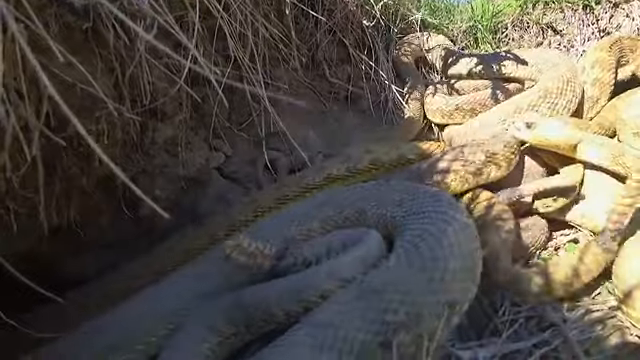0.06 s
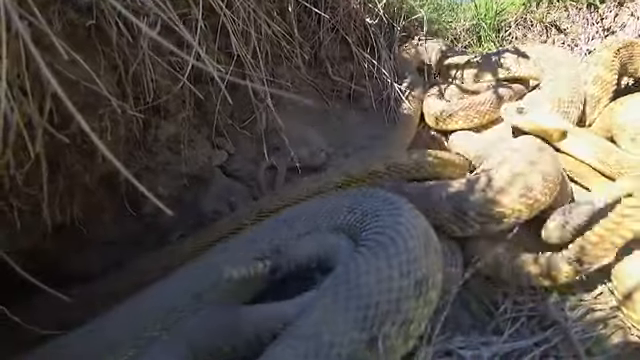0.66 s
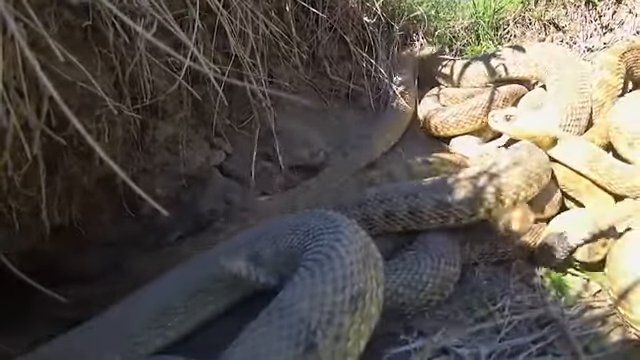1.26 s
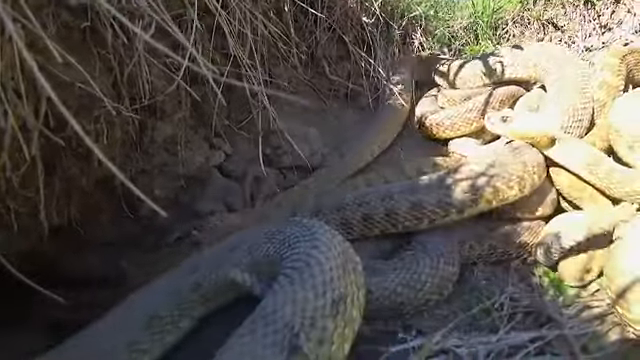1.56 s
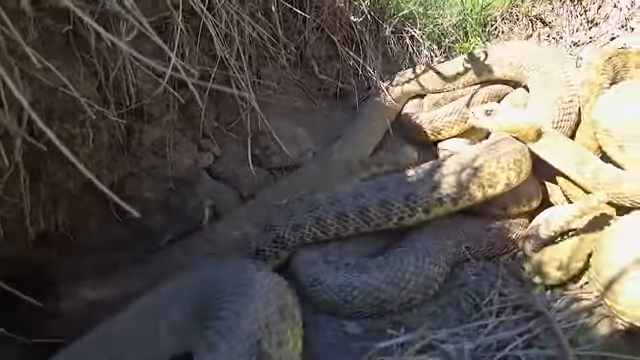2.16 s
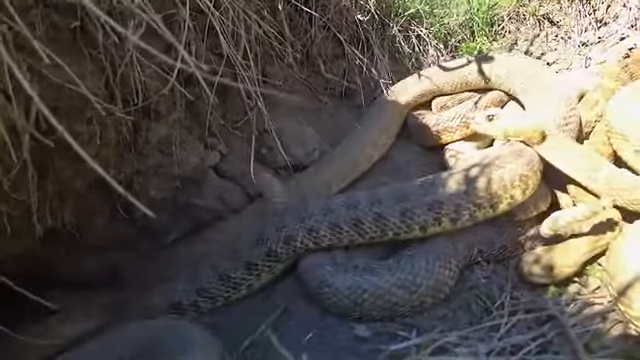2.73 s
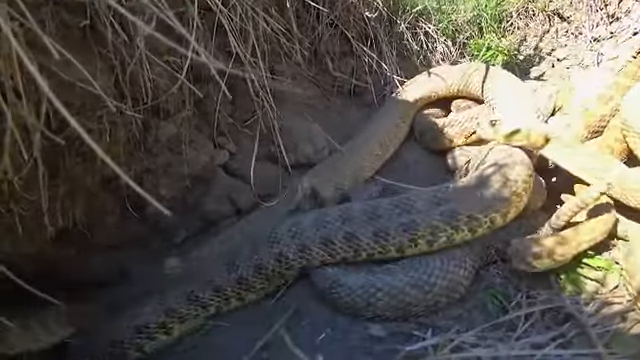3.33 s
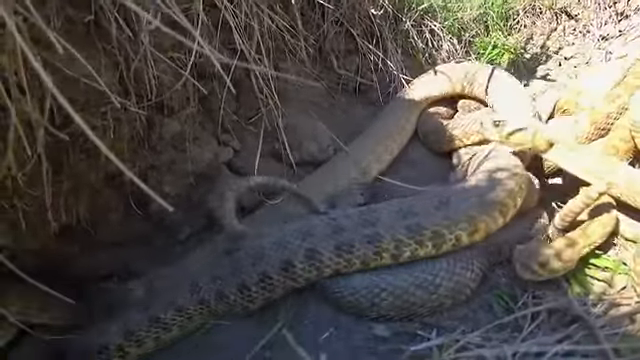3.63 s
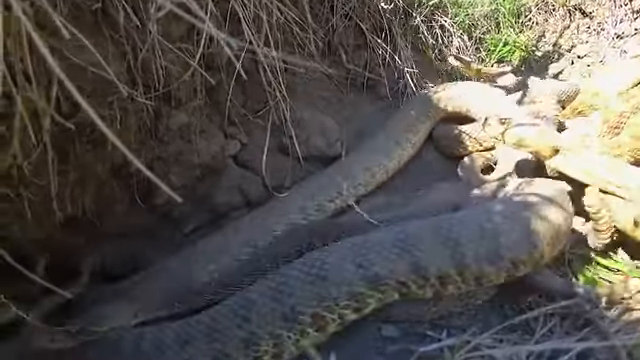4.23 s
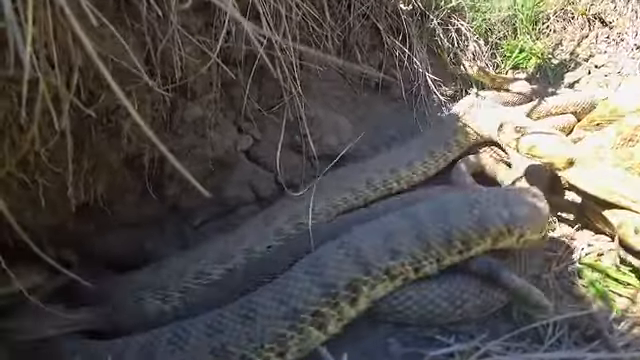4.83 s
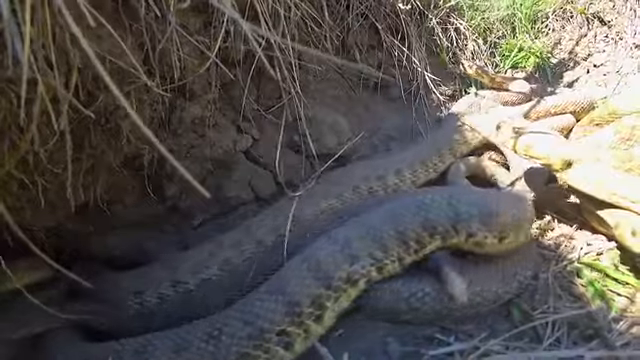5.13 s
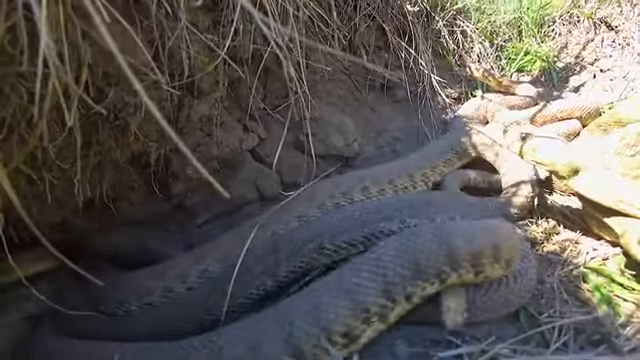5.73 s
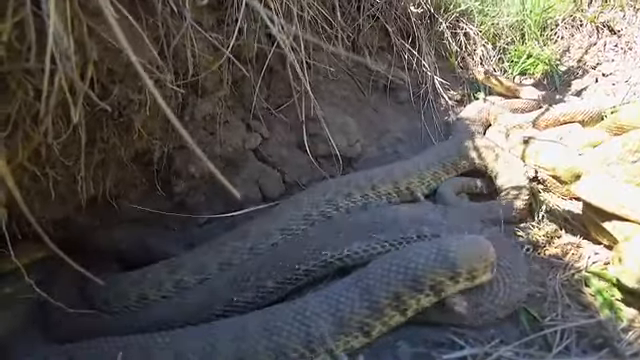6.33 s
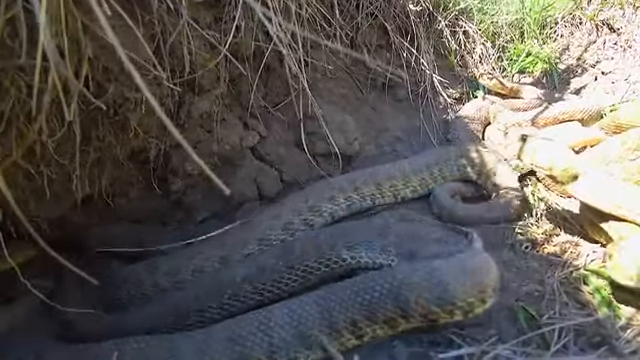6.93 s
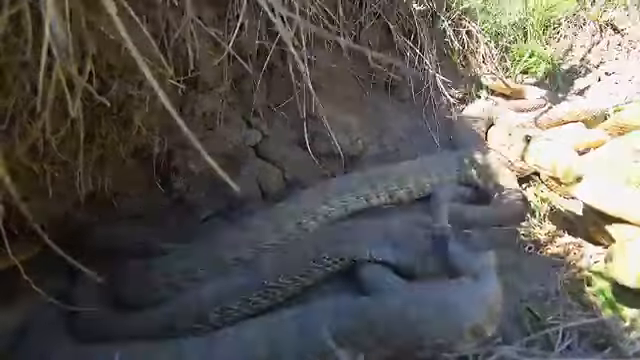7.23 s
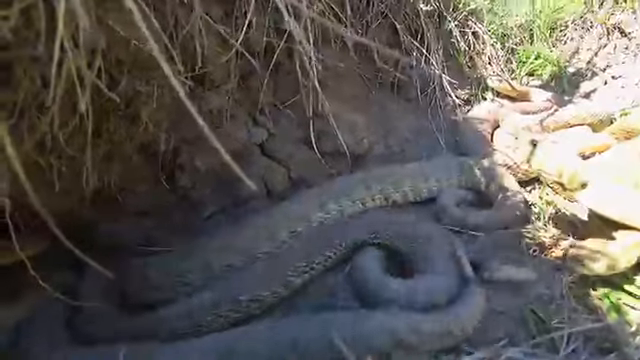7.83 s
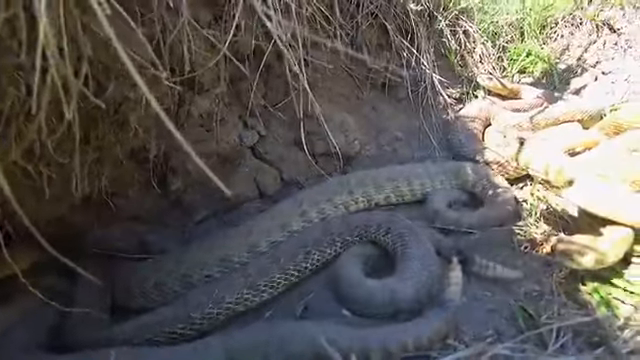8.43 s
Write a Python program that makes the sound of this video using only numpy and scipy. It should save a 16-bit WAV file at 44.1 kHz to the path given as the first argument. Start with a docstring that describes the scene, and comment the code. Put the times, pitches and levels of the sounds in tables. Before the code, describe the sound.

From the start, a rattlesnake buzzes its tail close to the microphone in a shallow earth den: a loud, dry, high whirr whose tone shifts as the tail turns. Around 2 seconds it stutters and falls apart into a quick run of sharp, hollow clicking shakes, lasting until about 3 seconds. The rest is quieter. Snakes slide over soil and each other with a soft hiss and gritty scrape, their rattles dragging and ticking irregularly, with small clusters of clicks between 3.7 and 5 seconds and stronger ones near 5.9 and 7.3 seconds. A farther rattle whirrs briefly at 4.5 seconds, then more steadily from about 5.7 to 7.3. Another starts in soft spurts from 7.4 seconds to the end at about 8.5. A low outdoor rumble runs underneath, with soft handling bumps near 2 and 4 seconds and a few faint knocks after 5.

```python
"""A rattlesnake's tail buzzes close by in a shallow earth den, about 78 strokes a second, then falls
apart into single shakes: loose hollow segments clash and ring, their colour turning with the tail.
Snakes slide over soil and each other, rattles dragging and clicking; a farther one whirrs, and a last
one starts up softly. Bodies scrape the dirt over a low outdoor rumble, with soft handling bumps and
a few small knocks."""
import sys
import numpy as np
from scipy import signal
from scipy.fft import rfft, irfft, next_fast_len
from scipy.io import wavfile
from scipy.ndimage import uniform_filter1d, map_coordinates

SR = 44100
rng = np.random.default_rng(int(sys.argv[2]) if len(sys.argv) > 2 else 0)


def transcribe(u):
    """Save the signal u as a 16-bit wav file named by the first command-line argument.

    u: samples, shape (n,) or (channels, n), limited to [-1, 1]; the rate is SR.
    q: integer samples, one column per channel.
    """
    v = np.clip(np.atleast_2d(u).T, -1, 1)
    q = np.round(v * 32767).astype(np.int16)
    wavfile.write(sys.argv[1], SR, q)


N = 378378
BUZZ_END_S = 2.195

# the near rattle's pose: time_s, pitch_ratio of its low resonances, turned_away (0-1), treble_db
RATTLE_POSE = [(0, 1.016, 0.14, -0.5), (.37, 0.86, 0, 2.5), (.7, 0.96, 0.2, 1), (.9, 1.075, 0.37, 0.5),
               (1.1, 1.033, 0.9, 2), (1.55, 1.033, 0.9, 1), (1.85, 1.0, 0.85, -3.5),
               (2.25, 1.06, 0.53, -6.5), (2.46, 1.27, 0, 2), (2.64, 1.17, 0.5, 2.5), (2.78, 1.06, 0.7, 3),
               (2.88, 0.89, 1, 9), (2.98, 0.8, 0.1, -4), (3.1, 0.84, 0, -5), (3.9, 1.15, 0.2, -5),
               (5.05, 1.17, 0, -10.5), (6.0, 1.3, 0, -7), (7.3, 1.22, 0.2, -9)]
# how hard the bodies slide: time_s, level_db
BODY_SLIDE = [(0, -60.5), (1.6, -59.5), (2.1, -48), (3.6, -51.5), (4.04, -47.5), (4.35, -49), (4.75, -55.5),
              (5.3, -55), (5.52, -52), (6.1, -55.5), (7.0, -58), (8.58, -60)]
# stereo width of the rattles and scales: frequency_hz, side_over_mid_db
RATTLE_WIDTH = [(1000, -26), (2500, -72), (4500, -29), (8000, -15.5), (12000, -7)]
# stereo width of the ground and air: frequency_hz, side_over_mid_db
GROUND_WIDTH = [(60, -22), (150, -20), (300, -10), (700, -2.5), (2000, -1)]


def amp(db):
    return 10 ** (np.asarray(db) / 20)


def unit(x):
    return x / np.sqrt(np.mean(x ** 2) + 1e-20)


def steady(x, size):
    """Ride x to an rms of 1 over a running window of size samples."""
    return x / np.sqrt(np.abs(uniform_filter1d(np.mean(x ** 2, axis=0), size=size)))


def along(points, hz):
    """Read (frequency_hz, value) points on a log frequency axis."""
    frequencies, values = np.transpose(points)
    return np.interp(np.log(hz + 1), np.log(frequencies + 1), values)


def curves(rows):
    """An automation curve for each column after the time."""
    time_s, *columns = np.transpose(rows)
    return [np.interp(np.arange(N) / SR, time_s, column) for column in columns]


def wobble(rate):
    """A smooth random curve, rate knots a second."""
    coarse = np.arange(0, N + 32, 32)
    knots = rng.standard_normal(int(N * rate / SR) + 4)
    smooth = map_coordinates(knots, [coarse * rate / SR], mode="nearest")
    return np.interp(np.arange(N), coarse, smooth)


def ring(x, colour, size=1024):
    """Ring x through a minimum-phase body of the given (frequency_hz, gain_db) colour."""
    cepstrum = irfft(np.log(amp(along(colour, np.fft.rfftfreq(size, 1 / SR)))))
    fold = np.r_[1, np.full(size // 2 - 1, 2), 1, np.zeros(size // 2 - 1)]
    response = irfft(np.exp(rfft(cepstrum * fold)))
    return signal.fftconvolve(x, response[None], axes=1)[:, :x.shape[1]]


def spread(pair, width):
    """Two unrelated signals, as mid and side, become left and right."""
    side = ring(pair[1:], width)[0]
    return np.array([pair[0] + side, pair[0] - side])


def panned(x, pan_db):
    """Left louder than right by pan_db."""
    return x * amp(np.array([pan_db, -pan_db]).reshape(2, -1) / 2)


def add(track, sound, start_s):
    part = track[:, round(start_s * SR):][:, :sound.shape[1]]
    part += sound[:, :part.shape[1]]


def contacts(size, per_second, hiss, life_s=0.00048):
    """Tiny random impacts on a bed of rubbing hiss, as a pair of noises for mid and side."""
    hits = (rng.random(size) < per_second / SR) * rng.exponential(size=size) * SR / per_second
    decay = np.exp(-1 / (life_s * SR))
    power = signal.lfilter([1 - decay], [1, -decay], hits)
    return rng.standard_normal((2, size)) * np.sqrt(power + hiss ** 2)


def strokes(rate_hz, depth_db, scatter):
    """Loudness of a shaken tail: segments clash once a stroke; scatter is timing jitter in strokes."""
    phase = np.cumsum(rate_hz * np.ones(N)) / SR + scatter * wobble(60)
    clash = ((1 + np.cos(2 * np.pi * phase)) / 2) ** 2
    gain = amp(depth_db * clash * (1 + 0.05 * wobble(75)))
    return gain / np.sqrt(uniform_filter1d(gain ** 2, size=3000))


def hollow_segments(clashes):
    """Contacts ring the near rattle's horny shells, whose colour follows the pose of the tail."""
    # the rattle's colour facing out and turned away: frequency_hz, gain_db
    facing = [(300, -32), (900, -28), (2200, -23.5), (3000, -18), (3800, -10), (4700, 1), (5600, 3.2),
              (7700, -2), (9000, -4.5), (12200, -8), (14000, -11), (15600, -20)]
    turned = [(300, -37.5), (900, -27.5), (2300, -22.5), (2750, -18.5), (3300, -6.5), (4000, -7.5),
              (4650, -1), (5250, -6), (5800, -3), (7100, -3.5), (8100, -3.7), (9000, -6.5), (11500, -7.5),
              (14000, -14.5), (15600, -23)]
    # its sharpest resonances: centre_hz, half_width_hz, boost_db
    resonances = [(4450, 240, 2.5), (5300, 220, 0)]
    hz, t, spectrum = signal.stft(clashes, SR, nperseg=512)
    time_s, *pose = np.transpose(RATTLE_POSE)
    pitch_ratio, away, treble_db = [np.interp(t, time_s, column) for column in pose]
    hz = hz[:, None]
    shifted = hz / pitch_ratio ** np.clip(2 - hz / 6000, 0, 1)  # only the low resonances move
    colour_db = (1 - away) * along(facing, shifted) + away * along(turned, shifted)
    colour_db += sum(db / (1 + ((shifted - centre) / width) ** 2) for centre, width, db in resonances)
    colour_db += treble_db * np.clip((hz - 5000) / 6000, 0, 1)
    gain = amp(colour_db)
    gain /= np.sqrt(np.mean(gain ** 2, axis=0))  # turning changes the colour, not the power
    return signal.istft(spectrum * gain, SR, nperseg=512)[1][:, :N]


def shifting_colour(x, depth_db, hold_s):
    """Loose segments and the paths round the den keep changing, so narrow ridges of colour come and go."""
    spectrum = signal.stft(x, nperseg=512)[2]
    ridges = uniform_filter1d(rng.standard_normal(spectrum.shape[1:]), size=4, axis=0)
    ridges = uniform_filter1d(ridges, max(1, int(hold_s * SR / 256)), axis=1)
    return signal.istft(spectrum * amp(depth_db * unit(ridges)), nperseg=512)[1][:, :N]


def tail_buzz(crossover_hz=5600, release_s=.02):
    """The near tail: whole segments clack once a stroke, while their rims chatter more evenly on top."""
    # the buzz's fader and pan: time_s, level_db, pan_db
    buzz_mix = [(0, -18.5, 0), (.45, -19, -1), (.9, -17.5, 0), (1.55, -18, -1.5), (1.75, -20, 2.5),
                (1.94, -22, 3.5), (1.99, -29, -1), (2.05, -23, 4), (2.19, -27, 4)]
    # how fast the tail is shaken: time_s, rate_hz
    stroke_rate = [(0.0, 81.4), (0.32, 80.4), (0.42, 77.1), (0.93, 75.9), (1.03, 74.0), (1.33, 78.8),
                   (1.86, 80.1), (2.06, 75.7), (2.2, 75.8)]
    # how distinct the strokes are, deepened for clacks and eased for chatter: time_s, depth_db
    pulsing = [(0, 5.8), (.45, 5.2), (.75, 3.5), (1.05, 2), (1.5, 2.5), (1.72, 9), (1.92, 11.5), (2.02, 17),
               (2.2, 15)]
    level_db, pan_db = curves(buzz_mix)
    rate_hz, = curves(stroke_rate)
    depth_db, = curves(pulsing)
    stroke = strokes(rate_hz, depth_db, scatter=.003 * depth_db)  # distinct strokes come less evenly
    grains = contacts(N, per_second=4100, hiss=0.61)
    low, high = [signal.butter(3, crossover_hz, kind, fs=SR, output="sos") for kind in ("low", "high")]
    clacks = signal.sosfilt(low, steady(grains * stroke ** 1.15, size=3000))
    chatter = signal.sosfilt(high, steady(grains * stroke ** 0.7, size=3000))
    rattle = shifting_colour(hollow_segments(clacks + chatter), depth_db=1.2, hold_s=.25)
    rattle = steady(spread(rattle, RATTLE_WIDTH), size=5000)
    release = np.exp(-np.maximum(np.arange(N) / SR - BUZZ_END_S, 0) / release_s)
    return panned(rattle * amp(level_db) * release, pan_db)


def ground(sway_db=0.9, air_db=-57.5):
    """Heavy bodies scrape the dirt in small slips, over a low rumble and still outdoor air."""
    # colours of the rumble, the air and the scraped dirt: frequency_hz, gain_db
    rumble_colour = [(12, -27), (20, -2), (38, -5.5), (75, 0), (113, -3), (152, -5.5), (199, 0),
                     (235, -2.5), (280, -12.5), (330, -19), (430, -45), (730, -120)]
    air_colour = [(100, -12), (300, 0), (500, -11), (1000, -3), (2000, -8), (5000, -15.5), (15000, -14.5)]
    scrape_colour = [(150, -16.5), (300, -4.5), (450, 1.5), (600, -3), (800, -5.5), (1100, -11),
                     (1600, -13), (2500, -21), (5000, -15), (12000, -52)]
    # the rumble's slow rise and fall: time_s, level_db
    rumble_level = [(0.0, -55), (0.14, -58.5), (3.99, -48), (8.08, -54.5), (8.22, -51), (8.58, -54.5)]
    rumble_db, = curves(rumble_level)
    slide_db, = curves(BODY_SLIDE)
    rumble = unit(spread(ring(rng.standard_normal((2, N)), rumble_colour, size=16384), GROUND_WIDTH))
    air = unit(spread(ring(rng.standard_normal((2, N)), air_colour), GROUND_WIDTH))
    slips = contacts(N, per_second=900, hiss=1) * amp(1.1 * wobble(25))
    scrape = unit(spread(ring(slips, scrape_colour), GROUND_WIDTH))
    return rumble * amp(rumble_db + sway_db * wobble(7)) + scrape * amp(slide_db) + air * amp(air_db)


def bouts(rows, attack_share, release_s, swell_db_per_s=0.5):
    """Left and right gain for spells of rattling: each rises, swells slightly as it holds, and dies."""
    power = np.zeros((2, N))
    for start_s, length_s, level_db, pan_db in rows:
        t = np.arange(N) / SR - start_s
        rise = np.clip(t / (attack_share * length_s) + .5, 0, 1)
        swell_db = swell_db_per_s * (np.clip(t, 0, length_s) - length_s / 2)
        release = np.exp(-np.maximum(t - length_s, 0) / release_s)
        power += panned(rise * amp(level_db + swell_db) * release, pan_db) ** 2
    return np.sqrt(power)


def stirring_snakes(scales_over_slide_db=6, grit_db=-13.5):
    """Scales hiss over soil, the near rattle drags, a far one whirrs, and a last one starts up."""
    # colours of the scales, the far rattle and the last rattle: frequency_hz, gain_db
    scale_colour = [(500, -23), (1500, -16.5), (2800, -6), (3900, 0.5), (5200, -4), (7400, 4), (9000, 0.5),
                    (12500, -2.5), (15600, -12)]
    far_colour = [(700, -34), (2000, -20.5), (3200, -18.5), (4200, -7), (5000, 4), (5600, -1.5),
                  (6200, 2.5), (7200, -3), (8000, -0.5), (9000, -9.5), (12500, -12), (15600, -28)]
    last_colour = [(700, -33), (2000, -20.5), (2750, -7.5), (3300, -9), (4200, 1.5), (5000, 1), (5600, 0),
                   (6200, -2.5), (6900, -2), (7650, 0.5), (8800, -9.5), (12500, -11), (15000, -25)]
    # flicks and drags of the near rattle: start_s, length_s, level_db, pan_db, scale_rub_db (relative)
    drags = [(2.2, 0.1, -41.5, -1, 2.5), (2.431, 0.054, -28.5, 0, -9.5), (2.514, 0.08, -27.5, 0, -2),
             (2.618, 0.07, -26.5, -0.5, -4.5), (2.727, 0.036, -25.5, 2.5, -1.5),
             (2.81, 0.1, -29.5, 0.5, -3.5), (2.949, 0.12, -32.5, 6.5, -19), (3.705, 0.023, -34, 7, -11),
             (3.835, .16, -40.5, -4.5, -0.5), (4.064, 0.015, -35.5, 5, -9), (4.208, 0.096, -39, -5.5, 2),
             (4.742, 0.011, -41, 7.5, -14), (4.862, 0.084, -38.5, 4.5, -11), (4.96, 0.34, -43, 3.5, -10),
             (5.058, 0.046, -37.5, 5, -10), (5.39, .13, -47, 3, -3), (5.867, 0.18, -37.5, -2, -24),
             (7.278, 0.02, -32.5, 0, -17)]
    # whirrs of the far rattle and of the last: start_s, length_s, level_db, pan_db
    far_bouts = [(3.15, 1.6, -54, 0), (4.42, 0.15, -40, -4), (5.3, 0.31, -49.5, 5), (5.73, .47, -39, -1),
                 (6.2, 0.743, -43.5, -0.5), (7.03, 0.26, -44.5, -.5)]
    last_bouts = [(7.357, 0.26, -49, 6), (7.775, 0.32, -51, 9), (7.962, 0.396, -45.5, 7),
                  (8.38, 0.17, -40.5, 6)]
    scales = ring(contacts(N, per_second=1400, hiss=0.96) * amp(3.06 * wobble(90)), scale_colour)
    near = hollow_segments(contacts(N, per_second=1500, hiss=0.26) * amp(2.7 * wobble(120)))
    far = ring(contacts(N, per_second=1500, hiss=1.0) * amp(2.4 * wobble(110)), far_colour)
    last_grains = contacts(N, per_second=1900, hiss=0.35)
    last = ring(last_grains * strokes(rate_hz=50, depth_db=7.5, scatter=0.26), last_colour)
    grit = ring(contacts(N, per_second=70, hiss=0), scale_colour)  # crumbs and straws under the bellies

    slide_db, = curves(BODY_SLIDE)
    pulls = [row[:4] for row in drags]
    rubs = [(start, length, db + rub_db, pan_db) for start, length, db, pan_db, rub_db in drags]
    dragging, rubbing = [bouts(rows, attack_share=0.28, release_s=0.028) for rows in (pulls, rubs)]
    whirring = [bouts(rows, attack_share=.08, release_s=0.064) for rows in (far_bouts, last_bouts)]
    sliding = np.hypot(amp(slide_db + scales_over_slide_db), rubbing)
    gains = [sliding, dragging, *whirring]
    gains.append(amp(grit_db) * np.sqrt(sum(gain ** 2 for gain in gains)))  # grit follows all the rest
    layers = (scales, near, far, last, grit)
    mix = sum(gain * spread(unit(layer), RATTLE_WIDTH) for gain, layer in zip(gains, layers))
    return shifting_colour(mix, depth_db=1.3, hold_s=.35)


def shake(time_s, treble_db, half_width_s, size=2048, lead_s=.012, segment_hz=4320):
    """One cluster of segment contacts, pitched by the pose, and the den's brief answer: (start_s, sound)."""
    # a segment's colour round its lowest resonance: frequency_ratio, gain_db
    segment_colour = [(.2, -28.5), (.5, -27), (.7, -12), (.88, 0.5), (1.08, 5), (1.25, 2), (1.5, 2.5),
                      (2, -2)]
    t = np.arange(size) / SR - lead_s
    offset = t / half_width_s
    cluster = np.exp(-offset ** 2) * np.clip(2 * (offset + 0.77), 0, 1)
    den_tail = amp(-25 - 60 * t / 0.045) * (t > 0)
    clashes = contacts(size, per_second=2000, hiss=0.13) * (cluster + den_tail)
    pitch_ratio = np.interp(time_s, *np.transpose(RATTLE_POSE)[:2])
    resonance_hz = segment_hz * pitch_ratio ** 0.82
    hz = np.geomspace(900, 15500, 48)
    treble = [(5500, 0), (7500, (treble_db + 8) / 2), (9300, treble_db + 5.5),
              (12500, treble_db), (15500, treble_db - 12)]
    colour_db = np.interp(hz / resonance_hz, *np.transpose(segment_colour)) + along(treble, hz)
    colour_db += rng.normal(0, 2.7, len(hz))  # other segments touch each time
    sound = unit(spread(ring(clashes, np.c_[hz, colour_db]), RATTLE_WIDTH))
    return time_s - lead_s, sound * np.sqrt(.01 * SR / size)  # the energy of 10 ms at rms 1


def single_shakes(half_width_s=0.003184, crest_db=15, treble_lift_db=11):
    """Separate strokes of a tail, each throwing the segments together in one sharp click."""
    # the loudest shakes: time_s, rough_peak_db, treble_db (before the lift), pan_db
    shakes = [(1.9582, -7, -18, 8), (2.006, -10.5, -15, 7), (2.2161, -9, -16, 5), (2.234, -11.5, -16, 2.5),
              (2.2476, -12, -16, 5), (2.2662, -13.5, -15, 8), (2.3235, -16, -15, 5), (2.381, -17, -13, 0.5),
              (2.449, -10.5, -14, -2), (2.472, -17, -17, 0.0), (2.5297, -6, -5, 0.0),
              (2.5454, -9, -11, 0.0), (2.559, -14, -12, 0.0), (2.582, -6.5, -10, 5), (2.638, -10, -12, 4),
              (2.6525, -7, -13, -2), (2.6893, -16, -13, 0.0), (2.7232, -8.5, -8, 3), (2.7614, -12, -9, 4),
              (2.787, -9, -22, 9), (2.8042, -11.5, -24, 9), (2.8274, -10.5, -15, 6), (2.8424, -10, -27, 9),
              (2.861, -10, -21, 7), (2.8752, -10.5, -24, 5), (2.8924, -10, -11, 3.0),
              (2.9004, -8.5, -16, 5), (2.9264, -12.5, -21, 6), (2.9536, -9.5, -23, 7.5),
              (2.9762, -10, -17, 4.5), (3.0081, -10.5, -24, 7.0), (3.027, -15.5, -24, 9),
              (3.2979, -24, -14, 1.0), (3.7213, -10, -9, 3.0), (3.8704, -10.5, -8, 7),
              (3.933, -11, -19, -3.0), (4.2226, -12, -18, -5), (4.2507, -12.5, -17, -7),
              (4.268, -13, -17, -6), (4.3035, -13.5, -19, -7), (4.5665, -16, -14, -7),
              (4.602, -13.5, -7.5, -5.5), (4.8707, -13, -18, 5.5), (5.064, -24, -23, 4.5),
              (5.4094, -18, -16, 4), (5.461, -15, -13, 0.0), (5.4894, -15.5, -17, 0.0),
              (5.5788, -21, -18, -1), (5.6106, -17.5, -23, -1.5), (5.6902, -20, -22, 4),
              (5.8489, -11.5, -21, 0), (5.861, -7.5, -20.5, -2.5), (5.883, -10.5, -19, -1.0),
              (5.9218, -13, -24, -3), (5.9557, -9.5, -17.5, -4), (7.065, -23, -31, -3),
              (7.1805, -18.5, -28, -1), (7.2885, -16, -26, -3), (7.3082, -12, -21, -4),
              (7.3137, -11, -20, -2.0), (7.3459, -8.5, -16, -1.5), (7.419, -21.5, -27, -4),
              (7.5577, -25, -20, 0.5), (7.644, -29, -11, 7), (7.7862, -26, -11, 3.0),
              (7.8077, -22.5, -15, -1.0), (7.836, -21, -13, -3), (8.0047, -22, -11, 5.5)]
    out = np.zeros((2, N))
    for time_s, peak_db, treble_db, pan_db in shakes:
        start_s, sound = shake(time_s + half_width_s / 3, treble_db + treble_lift_db, half_width_s)
        add(out, panned(sound * amp(peak_db - crest_db), pan_db), start_s)
    return out


def handling_bumps():
    """Soft handling swells into short hollow booms of wavering pitch."""
    # the booms: centre_s, half_width_s, pitch_hz, level_db
    bumps = [(2.126, 0.012, 112, -44.5), (3.616, 0.11, 80, -49.5), (3.85, 0.25, 85, -51),
             (5.682, .04, 180, -50)]
    out, t = np.zeros(N), np.arange(N) / SR
    for centre_s, half_width_s, pitch_hz, level_db in bumps:
        swell = amp(level_db) * np.exp(-((t - centre_s) / half_width_s) ** 2)
        out += swell * np.sqrt(2) * np.sin(2 * np.pi * pitch_hz * t + 1.5 * wobble(9))
    return out


def stray_ticks(stirring, per_second=9, relative_db=-1, scatter_db=3):
    """Loose segments tick at random after the buzz, louder where the snakes stir more."""
    out = np.zeros((2, N))
    level = np.sqrt(np.abs(uniform_filter1d(stirring ** 2, size=4410, axis=1)))
    count = int(per_second * (N / SR - BUZZ_END_S))
    for time_s in rng.uniform(BUZZ_END_S, (N - 1) / SR, count):
        start_s, sound = shake(time_s, treble_db=-6.5, half_width_s=0.0022)
        gain = level[:, [int(time_s * SR)]] * amp(relative_db + scatter_db * rng.standard_normal())
        add(out, sound * gain, start_s)
    return out


def dull_knocks(size=4096, t60_s=0.039, crest_db=22.5):
    """Light knocks: each blow is a fast-dying burst that sounds a tap and a soft thud."""
    # the blows: start_s, rough_peak_db, thud_over_tap_db
    knocks = [(5.43, -36, -7), (5.894, -34, -5), (6.264, -38.5, -5), (7.069, -36, -11), (7.387, -35.5, -10),
              (7.833, -38, -7)]
    # the tap's colour: frequency_hz, gain_db
    tap_colour = [(300, -14), (800, -14), (1100, -6), (1400, -6.5), (1900, -13.5), (3000, -26), (8000, -29)]
    out, t = np.zeros((2, N)), np.arange(size) / SR
    for start_s, peak_db, thud_db in knocks:
        blow = rng.standard_normal((2, size)) * amp(-60 * t / t60_s)
        tap = unit(ring(blow, tap_colour))
        thud = unit(ring(blow, colour=[(100, -12), (400, -1), (900, -9), (3000, -45)]))
        add(out, amp(peak_db - crest_db) * spread(tap + amp(thud_db) * thud, GROUND_WIDTH), start_s)
    return out


def scene():
    """The buzzing tail, the stirring den and the ground, all up close."""
    stirring = stirring_snakes()
    snakes = tail_buzz() + single_shakes() + stirring
    return snakes + ground() + dull_knocks() + handling_bumps() + stray_ticks(stirring)


def record(dry, ceiling=.75, top_hz=16000):
    """A soft clip rounds off the tallest peaks, and a brick-wall filter cuts the very top."""
    rounded = dry / (1 + (dry / ceiling) ** 6) ** (1 / 6)
    size = next_fast_len(N + 8192)
    passband = np.fft.rfftfreq(size, 1 / SR) < top_hz
    return irfft(rfft(rounded, size) * passband, size)[:, :N]


dry = scene()
out = record(dry)
transcribe(out)
```